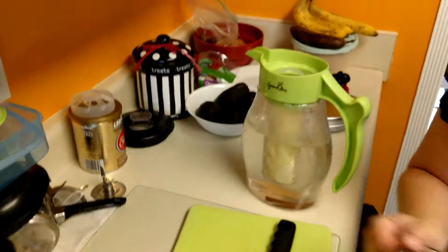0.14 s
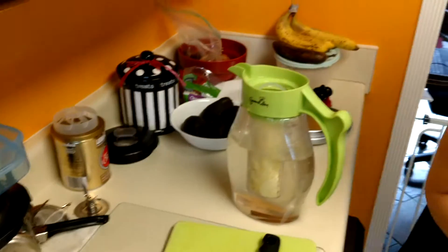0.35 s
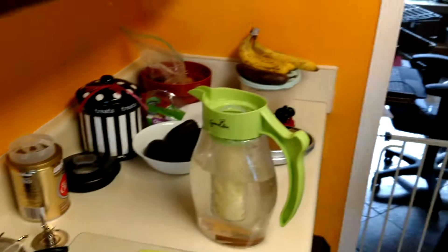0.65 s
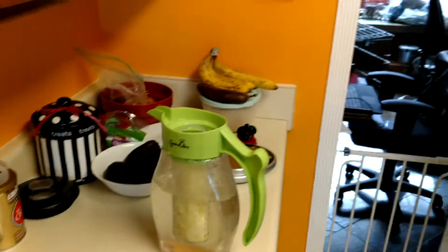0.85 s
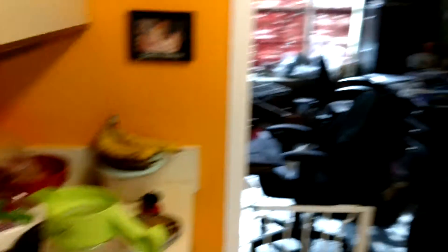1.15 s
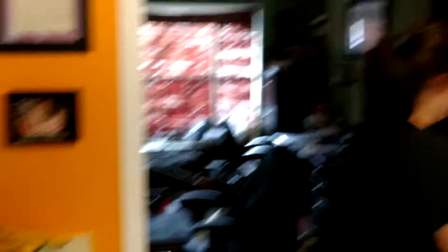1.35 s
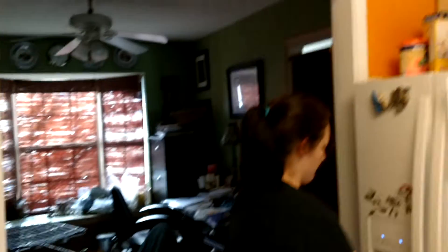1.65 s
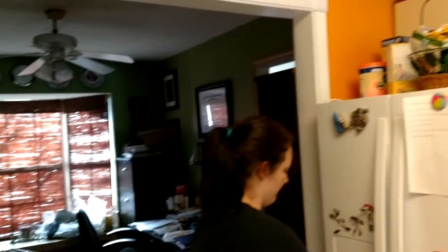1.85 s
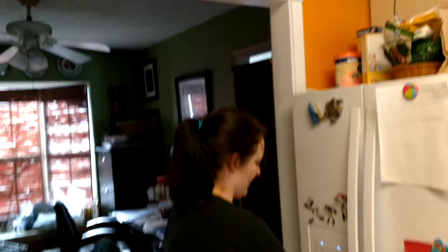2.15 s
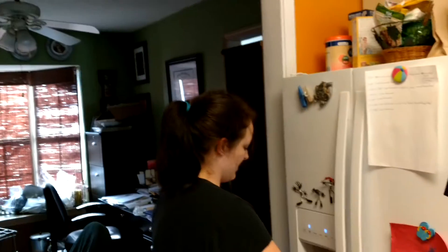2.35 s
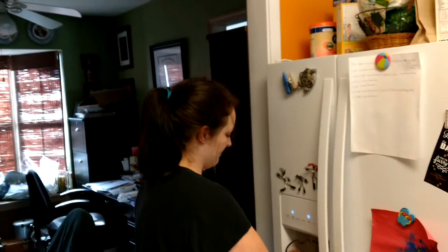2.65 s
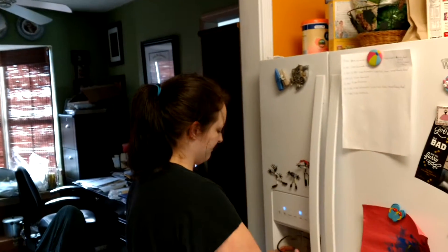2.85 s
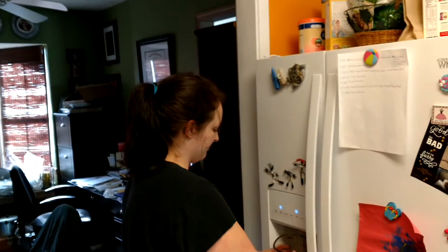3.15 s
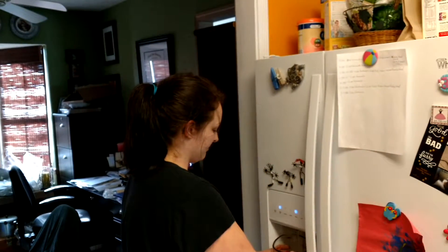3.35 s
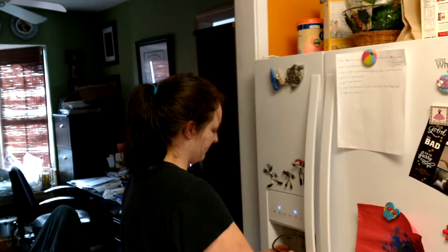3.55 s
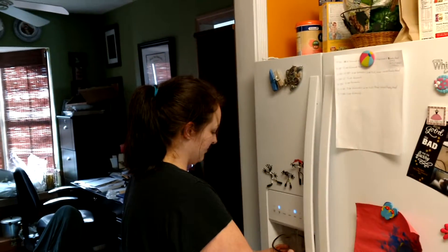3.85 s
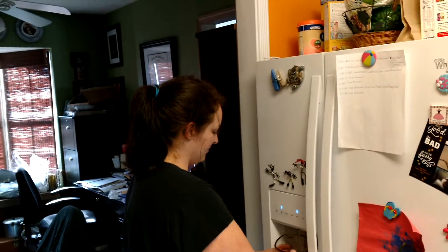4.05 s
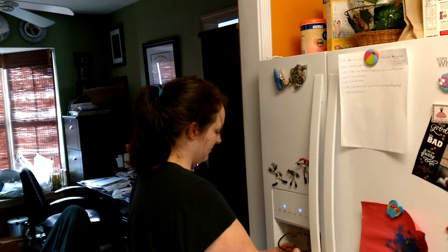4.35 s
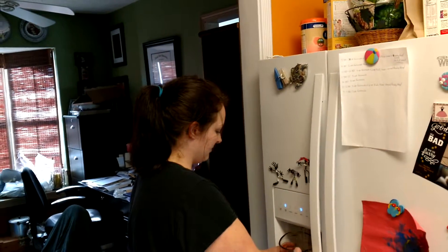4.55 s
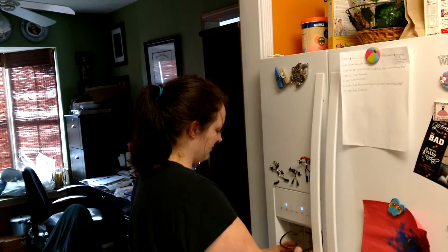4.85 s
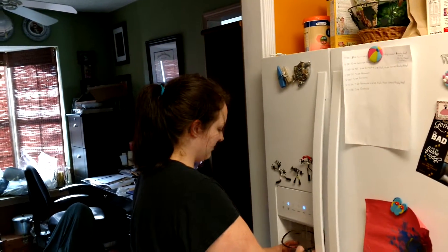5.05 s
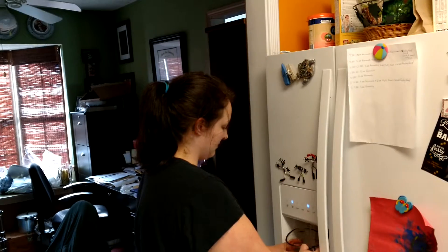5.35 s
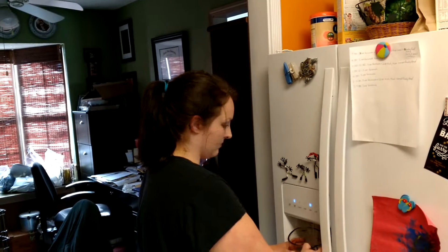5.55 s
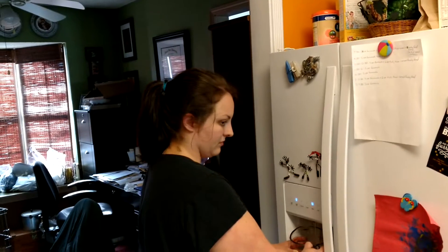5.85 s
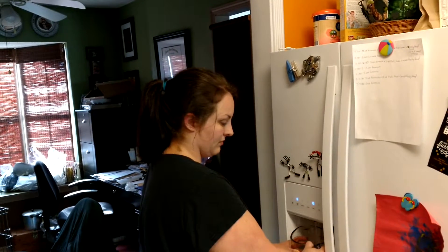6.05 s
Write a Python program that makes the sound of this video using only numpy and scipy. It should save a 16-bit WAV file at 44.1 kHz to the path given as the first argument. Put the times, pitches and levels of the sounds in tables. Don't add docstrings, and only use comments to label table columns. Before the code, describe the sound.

Handling rustle and thumps, then hard plastic knocks on a fridge dispenser, a buzzing valve and water spraying and gurgling into a pitcher.

```python
import sys
import numpy as np
from scipy import signal
from scipy.fft import rfft, irfft, next_fast_len
from scipy.io import wavfile
from scipy.ndimage import uniform_filter1d

SR = 44100
rng = np.random.default_rng(int(sys.argv[2]) if len(sys.argv) > 2 else 0)


def unload_wav(signal):
    wavfile.write(
        sys.argv[1],
        SR,
        np.round(np.clip(np.atleast_2d(signal).T, -1, 1) * 32767).astype(np.int16),
    )


def rack_gain(trim_db):
    fader = np.asarray(trim_db, float)
    return 10 ** (fader / 20)


N = 272979
SIZE = next_fast_len(N + SR)
FREQS = np.maximum(np.fft.rfftfreq(SIZE, 1 / SR), 1)

# time in seconds, hiss in dB.
HISS_LEVEL = [(0, -68.5), (.5, -68.5), (.95, -65.5), (1.7, -61), (2.0, -67), (2.25, -68.5), (2.6, -64),
              (5.05, -64.5), (5.3, -65.5), (6.19, -63.5)]


def rms_one(x):
    return x / np.sqrt(np.mean(x ** 2) + 1e-20)


def in_time(rows, quiet=-120):
    s, *columns = np.transpose(rows)
    return [np.interp(np.arange(N) / SR, s, column, quiet, quiet) for column in columns]


def at_hz(points, hz=FREQS):
    point_hz, value = np.transpose(points)
    return np.interp(np.log(hz), np.log(point_hz), value)


def colour(x, db_points):
    below = np.log2(db_points[0][0] / FREQS)
    above = np.log2(FREQS / db_points[-1][0])
    beyond = np.maximum(0, np.maximum(below, above))
    return irfft(rfft(x, SIZE) * rack_gain(at_hz(db_points) - 25.0 * beyond), SIZE)[..., :N]


def drift(rate):
    r = np.exp(-80 * np.pi * rate / SR)
    slow = signal.lfilter([1], [1, -2 * r, r * r], rng.standard_normal(N // 40 + 2002))[2000:]
    return np.interp(np.arange(N) / 40, np.arange(len(slow)), rms_one(slow))


def diffuse(excite):
    side = signal.lfilter(*signal.butter(2, 650, "high", fs=SR), excite[1])
    return np.array([excite[0] + side, excite[0] - side]) / np.sqrt(2)


def noise(spectrum, patchy_db=0., rate=10.):
    return rms_one(colour(diffuse(rng.standard_normal((2, N))), spectrum)) * rack_gain(patchy_db * drift(rate))


def kitchen(x, wet_db):
    # frequency in Hz, t60 in seconds.
    room = [(150, 0.42), (600, 0.52), (2000, 0.18), (5000, 0.28), (12000, 0.098)]
    # frequency in Hz, level in dB.
    near_left = [(250, 9), (700, -10), (15000, -91)]
    t, tail = np.arange(SR // 2) / SR, np.zeros((2, N))
    onset = np.clip(t / 0.0017 - .3, 0, 1)
    for hz, t60 in room:
        band = signal.butter(1, [hz / 1.9, min(hz * 1.9, .45 * SR)], "band", fs=SR, output="sos")
        dying = signal.sosfilt(band, rng.standard_normal((2, SR // 2))) * rack_gain(-60 * t / t60)
        tail[:, :SR // 2] += dying * onset
    tail = diffuse(tail)
    tail = tail / np.sqrt(np.sum(tail ** 2) / 2)
    paths = rack_gain([at_hz(near_left), 0 * FREQS]) + rack_gain(wet_db) * rfft(tail, SIZE)
    return irfft(rfft(x, SIZE) * paths, SIZE)[:, :N]


def whine():
    # time in seconds, pitch in Hz.
    whistle = [(0, 12900), (.27, 12800), (.33, 12500), (.55, 12750), (.8, 12800), (1.0, 13000),
               (2.25, 13000), (2.36, 13500), (2.45, 13400), (2.58, 13000), (6.19, 12930)]
    # time in seconds, pitch in Hz, level in dB against the whistle.
    partner = [(.45, 12400, -33), (.6, 11900, 4), (.76, 11950, 6), (.85, 11900, -30), (2.3, 12900, -30),
               (2.36, 12800, 4), (2.45, 12700, 6), (2.6, 12400, -3), (2.7, 12100, -30)]
    (hz,), (low_hz, low_db) = in_time(whistle), in_time(partner)
    slow = signal.lfilter(*signal.butter(2, 110, fs=SR), rng.standard_normal((2, 2, N)))
    slow = rms_one(slow) * rack_gain(2.5 * drift(3.0))
    turn, low_turn = 2 * np.pi * np.cumsum(hz) / SR, 2 * np.pi * np.cumsum(low_hz) / SR
    upper = slow[0] * np.cos(turn) + slow[1] * np.sin(turn)
    lower = slow[1] * np.cos(low_turn) + slow[0, ::-1] * np.sin(low_turn)
    return upper + rack_gain(low_db) * lower


def hiss():
    # frequency in Hz, density in dB per Hz.
    spectrum = [(60, -6), (500, 1), (4000, -3.5), (10500, -7), (12600, 0), (13300, -6), (15700, -0.5)]
    (hiss_db,) = in_time(HISS_LEVEL)
    level = rack_gain(hiss_db + 5.0) * rack_gain(0.34 * drift(7.2))
    return level * (rms_one(colour(rng.standard_normal((2, N)), spectrum)) + rack_gain(-12.5) * whine())


def air():
    # frequency in Hz, density in dB per Hz.
    spectrum = [(40, 7), (70, -54), (250, 0), (500, -8.5), (1300, -13), (1900, -10.5), (2600, -17.5),
                (3800, -50), (4800, -11.5), (6000, -56), (9000, -79)]
    (hiss_db,) = in_time(HISS_LEVEL)
    return rack_gain(hiss_db + 3) * noise(spectrum, patchy_db=0.24, rate=7.8)


def compressor():
    # frequency in Hz, level in dB rms.
    mains = [(59.5, -59), (119.95, -58.5)]
    t = np.arange(N) / SR
    lines = sum(rack_gain(db + 2 * drift(5.4)) * np.sin(2 * np.pi * hz * t) for hz, db in mains)
    return rack_gain(1.1 * (in_time(HISS_LEVEL)[0] + 65.5)) * lines


def clicks():
    # start in seconds, peak in dB.
    taps = [(.213, -39), (.2545, -39), (.2585, -46), (0.263, -39), (.679, -40)]
    out, t = np.zeros(N + 400), np.arange(400) / SR
    swing = np.sin(2 * np.pi * 855 * t) * np.exp(-t / 0.00069)
    for s, peak_db in taps:
        out[round(s * SR):][:400] -= rack_gain(peak_db - 4.0) * swing
    return out[:N] * np.array([[.4], [1]])


def grip():
    # start in seconds, peak in dB.
    jolts = [(0.22, -34), (0.686, -43.5), (0.812, -38), (0.9, -42), (0.95, -34.5), (0.987, -35.5),
             (1.052, -41), (1.072, -36.5), (1.084, -42), (1.098, -41), (1.117, -51), (1.148, -42),
             (1.174, -40), (1.196, -40), (1.216, -37), (1.235, -39), (1.25, -39.5), (1.268, -38.5),
             (1.297, -37), (1.356, -33.5), (1.689, -27), (1.891, -22), (2.048, -35), (2.181, -42),
             (2.746, -31), (4.167, -38), (4.238, -26.5), (4.331, -33), (5.069, -41)]
    out, t = np.zeros(N + 4000), np.arange(4000) / SR
    fall = .006 * (1 - np.exp(-t / .005))
    snap = rack_gain(-5) * np.sin(2 * np.pi * 700 * t) * np.exp(-t / 0.0011)
    for (s, peak_db), pick in zip(jolts, rng.random(len(jolts))):
        slipping = 1.04 < s < 1.31 or .6 < s < .7
        hz, last_s, rise_s = (119, 0.016, 0.00026) if slipping else (62 + 30 * pick, .02, .003)
        thump = np.sin(2 * np.pi * hz * (t + fall)) * np.exp(-t / last_s) * (1 - np.exp(-t / rise_s))
        thump += slipping * snap
        out[round(s * SR):][:4000] += rack_gain(peak_db - 0.5) * thump
    rumble = rms_one(colour(rng.standard_normal(N), [(55, -15.5), (110, -26.5), (220, -28.0)]))
    rumble = rack_gain(-57.0 + 2.0 * drift(7.3)) * rumble
    return (out[:N] + rumble) * np.array([[.25], [1]])


def bubbles():
    # start in seconds, peak in dB, pitch in Hz.
    spits = [(2.11, -45.5, 8300), (2.151, -51, 8900), (2.418, -53, 12810), (2.659, -55, 12000),
             (2.66, -50, 14300), (2.738, -47, 11300), (2.864, -48, 13500), (2.862, -42, 6100),
             (3.088, -42.5, 10100), (3.147, -46.5, 11400), (3.182, -46, 9500), (3.253, -41, 9100),
             (3.314, -41, 13500), (3.41, -47, 7600), (3.517, -46, 6850), (3.68, -39, 6800),
             (3.703, -41, 6900), (3.793, -49, 6400), (3.808, -43.5, 5560), (3.994, -38.5, 13700),
             (3.994, -53, 10100), (4.005, -44, 13000), (4.163, -47.5, 7100), (4.47, -68, 5860),
             (4.515, -52, 5650), (4.267, -49, 5700), (4.164, -41, 5670), (4.189, -45, 7400),
             (4.893, -50, 8000), (4.942, -35.5, 8500), (5.486, -49.5, 7240), (5.552, -48, 6400),
             (5.654, -43.5, 6650), (6.017, -47.5, 9900), (6.053, -45, 12300)]
    # start in seconds, peak in dB, pitch in Hz.
    creaks = [(.454, -60, 12600), (.504, -60, 12000), (.534, -53, 13900), (.617, -52, 13000),
              (.7, -54, 12500), (.942, -51, 11000), (.952, -38, 8800)]
    # start in seconds, peak in dB.
    burst_rows = [(3.165, -33), (3.312, -31), (3.419, -34), (3.567, -33), (3.717, -33), (3.857, -45),
                  (3.918, -36), (4.002, -37), (4.171, -35), (4.217, -31), (4.269, -42), (4.325, -45),
                  (4.387, -35), (4.435, -50), (4.524, -31), (4.575, -39), (4.849, -31), (4.866, -29),
                  (4.943, -35), (4.976, -33), (5.032, -34), (5.047, -31), (5.14, -30), (5.158, -42),
                  (5.21, -40), (5.498, -30.5), (5.575, -34), (5.667, -31), (5.774, -41), (5.909, -25),
                  (5.978, -32), (6.05, -33)]
    # start in seconds, peak in dB, pitch in Hz.
    pops = [(3.5004, -51, 3600), (3.6501, -48, 3200), (3.6506, -40.5, 2510), (3.7166, -34, 2560),
            (3.8087, -42.5, 2700), (3.9943, -51, 2450), (4.0068, -42, 2630), (4.0162, -47, 2540),
            (4.1385, -53, 2700), (4.174, -46, 3440), (4.1732, -31.5, 2580), (4.2178, -42, 2550),
            (4.3176, -39.5, 2680), (4.3344, -55, 2500), (4.5276, -36.5, 2660), (4.558, -49, 3270),
            (4.851, -42, 2670), (5.0394, -41, 2500), (5.0482, -37, 2520), (5.091, -47, 3180),
            (5.1619, -37.5, 2600), (5.22, -51, 2700), (5.2762, -44, 3170), (5.4704, -47, 2960),
            (5.4798, -40, 2590), (5.5026, -43.5, 2710), (5.5657, -43, 2690), (5.5772, -40, 2540),
            (5.6351, -55, 2900), (5.6445, -51, 2640), (5.9189, -41, 2560), (5.9687, -54, 2510),
            (6.09, -42, 2590), (6.17, -46, 2640)]
    scatter = rng.standard_normal(len(burst_rows))
    bursts = [(s, db, 2150 * (1 + 0.015 * u)) for (s, db), u in zip(burst_rows, scatter)]
    early_pops = [(s - .003, db + 3.5, hz) for s, db, hz in pops]
    return list(spits) + list(creaks) + bursts + early_pops


def drops():
    # start in seconds, peak in dB, pitch in Hz.
    ticks = [(.262, -54, 254), (.832, -34.5, 1830), (1.502, -20, 332), (1.503, -27, 209),
             (1.53, -27.5, 248), (1.898, -32, 246), (1.508, -37, 355), (1.553, -27, 348), (1.59, -33, 224),
             (1.884, -36.5, 387), (1.889, -30, 293), (1.905, -43, 340), (1.905, -32.5, 192),
             (1.737, -37.5, 1390), (1.819, -29, 1533), (1.82, -21, 2530), (1.82, -21, 2150),
             (1.51, -38, 305), (3.36, -53, 210)]
    # start in seconds, peak
    # in dB, pitch in Hz.
    splashes = [(3.163, -51, 2400), (3.329, -57, 990), (3.5, -49, 3560), (3.996, -43, 1510),
                (3.992, -43.5, 3100), (3.992, -50, 5140), (3.995, -58, 7000), (4.32, -43, 1400),
                (4.34, -46, 1010), (4.355, -43.5, 1260), (4.4, -52, 1140), (4.542, -42, 1280),
                (4.846, -38.5, 1360), (4.862, -48, 1850), (4.901, -44.5, 1130), (4.944, -42, 1740),
                (4.974, -57, 1900), (5.032, -46.5, 1400), (5.109, -46, 1250), (5.149, -49, 1610),
                (5.539, -43, 1700), (5.719, -51, 2020), (5.959, -44, 2190), (6.049, -40, 1700),
                (4.162, -41, 3020), (4.514, -40, 3220), (4.84, -55, 1000), (4.43, -49, 3000),
                (5.91, -57, 2500), (4.319, -38, 900), (5.487, -39, 800), (5.94, -45.5, 750),
                (6.0, -46, 700), (1.884, -32.5, 430), (1.897, -35, 330)]
    out, t = np.zeros(N + 4000), np.arange(4000) / SR
    rows = [(*row, row[2] > 5500) for row in bubbles() + list(ticks)]
    rows += [(*row, True) for row in splashes]
    spatter = rng.standard_normal((len(rows), 4000))
    for (s, peak_db, hz, broad), white in zip(rows, spatter):
        tone = np.sin(2 * np.pi * hz * t * (1 + 1.1 * t))
        wide, rough, rise_cycles = (1.5, .85, 2.6) if broad else (1.08, .4, 3.7)
        r = np.exp(-np.pi * hz * (wide - 1 / wide) / SR)
        band = [1, 0.0098, -1], [1, -2 * r * np.cos(2 * np.pi * hz / SR), r * r]
        spray = rms_one(signal.lfilter(*band, signal.lfilter(*band, white)))
        wave = (1 - rough) * tone + rough * spray
        t60 = 0.016 + 22 / hz
        shape = rack_gain(-60 * t / t60) * (1 - np.exp(-t / (0.00071 + rise_cycles / hz)))
        out[round(s * SR):][:4000] += rack_gain(peak_db + 7.0) * wave * shape
    return out[:N]


def swish():
    # start in seconds, length in seconds, brush in dB, rasp in dB.
    sweeps = [(0.78, 0.13, -64, -58), (0.906, 0.25, -52.5, -49.5), (1.315, 0.13, -56.5, -79)]
    # frequency in Hz, density in dB per Hz.
    cloth = [(300, -3), (1100, -10.5), (1500, -5), (1900, 5), (2800, -2.5), (3600, -10), (4800, -0.5),
             (6000, -29), (9000, -40)]
    # frequency in Hz, density in dB per Hz.
    rasp_spectrum = [(5000, -2), (7500, 0), (11000, -5), (16000, -4)]
    t, brush, rasp = np.arange(N) / SR, 0, 0
    for s, length, brush_db, rasp_db in sweeps:
        along = np.clip((t - s) / length, 0, 1)
        rise = np.clip((t - s) / 0.055, 0, 1)
        fall = np.clip((s + length - t) / 0.16 + 1, 0, 1)
        gate = (rise * fall) ** 2
        brush = brush + gate * rack_gain(brush_db - 5 * along)
        rasp = rasp + gate * rack_gain(rasp_db - 18.5 * along ** .5)
    brushing = rack_gain(4.5) * brush * noise(cloth, patchy_db=-2.3, rate=14.0)
    return brushing + rack_gain(8.5) * rasp * noise(rasp_spectrum)


def knocks():
    # start in seconds, peak in dB, brightness from 0 to 1, t60 in seconds.
    blows = [(1.5, -12, 0.02, 0.11), (1.551, -18.5, 0.26, 0.24), (1.589, -36.5, 0.9, 0.19),
             (1.735, -17.5, 0.42, 0.037), (1.744, -31, 0.51, 1), (1.818, -5.5, 1, 0.042),
             (1.822, -2.5, 0.97, 0.017), (1.844, -14, 0.82, 0.14), (1.864, -27.5, 0, 0.086),
             (1.884, -14.5, 0.1, 0.04), (1.909, -56, 0.1, 0.11)]
    # frequency in Hz, density in dB per Hz.
    hollow = [(150, -7), (240, -8), (340, -3.5), (430, -13.5), (800, -10), (1400, -10.5), (2100, -5.5),
              (3000, -21), (6000, -32)]
    # frequency in Hz, density in dB per Hz.
    crack_spectrum = [(500, -30), (750, -10), (1100, -3.5), (1500, -8.5), (2100, 7.5), (2800, -5),
                      (3800, -18), (5200, -4), (6500, -15), (8000, -15), (15500, -18.5)]
    white, after = rng.standard_normal((2, N)), np.arange(SR // 2) / SR
    crack, body = rms_one(colour(white[0], crack_spectrum)), rms_one(colour(white[1], hollow))
    out = np.zeros(N)
    for s, peak_db, bright, t60 in blows:
        span = slice(round(s * SR), round(s * SR) + SR // 2)
        bright = np.clip(bright, 0, 1)
        snap = crack[span] * (1 - np.exp(-after / 0.0013)) * rack_gain(-60 * after / (0.82 * t60))
        boom = body[span] * (1 - np.exp(-after / 0.0016)) * rack_gain(-60 * after / t60)
        out[span] += rack_gain(peak_db - 8.0) * (bright * snap + (1 - bright) * boom)
    return out


def gulps():
    # start in seconds, peak in dB, pitch in Hz.
    rings = [(1.821, -26, 5700), (1.82, -27, 4700), (1.84, -28.5, 4400)]
    # start in seconds, peak in dB.
    pings = [(2.863, -37), (3.115, -45), (3.854, -41), (4.002, -46), (4.267, -46), (4.382, -45.5),
             (4.471, -41), (4.516, -42.5), (4.789, -43.5), (4.846, -41), (4.895, -41), (4.995, -39.5),
             (5.357, -52), (5.537, -47.5), (5.658, -26), (5.672, -38), (5.788, -51), (5.838, -59),
             (6.052, -50), (6.093, -52), (3.977, -55), (4.162, -44), (4.584, -52), (4.768, -47.5),
             (5.069, -49), (5.1, -52), (5.184, -50), (5.69, -44), (5.8, -57), (6.043, -48)]
    # start in seconds, peak in dB, pitch in Hz.
    gulp_rows = [(3.327, -50, 990), (3.3539, -43.5, 1000), (3.418, -43.5, 1456), (3.5433, -42.5, 1620),
                 (3.7357, -52, 1660), (3.797, -45, 1620), (3.9085, -37.5, 1740), (3.9925, -43, 1200),
                 (4.2046, -62, 1370), (4.2322, -52, 1210), (4.2749, -46, 1666), (4.3206, -41.5, 973),
                 (4.517, -43.5, 1143), (4.5772, -47, 1120), (4.6301, -63, 1050), (4.672, -54, 1100),
                 (4.8439, -46, 970), (4.9264, -52, 990), (4.9496, -51, 1090), (4.9814, -57, 965),
                 (5.0277, -56, 1135), (5.0788, -51, 920), (5.1005, -46, 963), (5.39, -53, 1690),
                 (5.4696, -60, 975), (5.501, -47, 977), (5.5466, -42, 945), (5.6525, -45, 1117),
                 (5.713, -51.5, 970), (5.7723, -59, 890), (5.91, -39, 1690), (6.0525, -50, 1670)]
    # start in seconds, peak in dB, pitch in Hz.
    glugs = [(4.234, -58, 720), (4.321, -48, 763), (4.388, -61, 706), (4.837, -60, 760), (4.894, -44, 790),
             (4.925, -44, 863), (5.024, -47, 895), (5.042, -49, 750), (5.101, -60, 810), (5.132, -49, 735),
             (5.15, -49, 795), (5.199, -50, 790), (5.249, -49, 800), (5.32, -47.5, 760), (5.388, -51, 644),
             (5.447, -45.5, 800), (5.491, -29.5, 755), (5.527, -44, 804), (5.552, -51, 806),
             (5.589, -48, 678), (5.624, -50, 810), (5.658, -42, 760), (5.676, -38.5, 746),
             (5.697, -39.5, 820), (5.736, -50, 776), (5.784, -50, 748), (5.831, -52.5, 676),
             (5.846, -47.5, 784), (5.862, -47.5, 783), (5.942, -38.5, 741), (5.992, -44, 642),
             (6.013, -40, 611), (6.028, -38.5, 652), (6.054, -42, 773), (6.098, -41, 655),
             (6.151, -47, 767)]
    out, t = np.zeros(N + 4000), np.arange(4000) / SR
    rows = [(s, db - 0.5, hz) for s, db, hz in gulp_rows]
    rows += [(s, db - 3.0, hz) for s, db, hz in glugs]
    rows += [(s, db - 2.0, hz) for s, db, hz in rings]
    scatter = rng.standard_normal(len(pings))
    rows += [(s, db - 6.0, 4825 * (1 + 0.011 * u)) for (s, db), u in zip(pings, scatter)]
    flutter = signal.lfilter([1], [1, -1.96, .9604], rng.standard_normal((len(rows), 4000)))
    for (s, peak_db, hz), slow in zip(rows, flutter):
        closing = np.maximum(t - 0.0029 - 11.3 / hz, 0)
        shape = (1 - np.exp(-t / 0.0012)) ** 2 * rack_gain(-60 * closing / 0.011)
        tone = np.sin(2 * np.pi * hz * t * (.98 + 0.86 * t)) * (1 + .3 * rms_one(slow))
        out[round((s - 4 / hz) * SR):][:4000] += rack_gain(peak_db) * shape * tone
    return out[:N]


def valve():
    # time in seconds, level in dB.
    coil = [(1.9, -93), (2.05, -63), (2.7, -57), (4.5, -58), (6.19, -58)]
    # multiple of 120 Hz, level in dB.
    harmonics = [(2, -5.5), (3, 3), (4, -8.5), (5, -12.5), (6, -7.5), (7, -7), (8, -15.5), (10, -22)]
    turn, (valve_db,) = 2 * np.pi * 119.95 * np.arange(N) / SR, in_time(coil)
    buzz = 0
    for k, db in harmonics:
        level = rack_gain(db + 0.5 + 2.33 * drift(4.8))
        buzz = buzz + level * np.sin(k * turn + rng.uniform(0, 7.46) + 0.53 * drift(6.0))
    rattle = noise([(180, 1.5), (300, 8.0), (450, -3.0), (700, 6.0), (1000, -28.0)])
    rattle = rattle * (1 + 0.17 * np.sin(2 * turn))
    return rack_gain(valve_db) * (buzz + rack_gain(2.0) * rattle)


def grains(per_s, low_hz, high_hz, cycles, spread_db, count=8):
    sizes = rack_gain(spread_db * np.minimum(rng.exponential(1, N), 2.8)) * rng.choice([-1, 1], N)
    born = rng.random(N) < per_s * rack_gain(3 * drift(8)) / SR
    dealt, out = rng.integers(0, count, N), np.zeros(N)
    for k, hz in enumerate(np.geomspace(low_hz, high_hz, count)):
        r, w = rack_gain(-60 * hz / (cycles * SR)), 2 * np.pi * hz / SR
        struck = sizes * born * (dealt == k) + 1e-18
        out += signal.lfilter([0, np.sin(w)], [1, -2 * r * np.cos(w), r * r], struck)
    return rms_one(out)


def grown(shallow_db, deep_db, halfway_s, growth_s, share):
    # time in seconds, level in dB.
    churn = [(2.06, 0.5), (2.16, -1.5), (2.4, 0), (2.9, 0), (3.31, 1), (3.54, 0), (3.77, 3), (4.43, 2.5),
             (4.61, 3), (4.83, -0.5), (5.0, 2), (5.15, 1.5), (5.29, -1.5), (5.5, -1.5), (5.66, 2.5),
             (5.98, -2), (6.19, -0.5)]
    (churn_db,), t = in_time(churn), np.arange(N) / SR
    deepened = 1 / (1 + np.exp((halfway_s - t) / max(growth_s, .01)))
    return shallow_db + (deep_db - shallow_db) * deepened + share * churn_db


def jet():
    # frequency in Hz, density in dB per Hz.
    spray = [(2800, -6), (4200, 2.5), (4800, 8.5), (5400, -7.5), (7000, 1.5), (10000, -99), (15500, -17)]
    # frequency in Hz, density in dB per Hz.
    froth = [(1200, -29.5), (1700, -4.5), (2150, 2), (2600, -4), (3400, -15.5), (4200, -13.5)]
    # frequency in Hz, density in dB per Hz.
    gurgle = [(150, -0.5), (300, 10), (450, -27), (750, -6), (1100, 0), (1600, -1.5)]
    spray_db = grown(shallow_db=-59.5, deep_db=-53, halfway_s=4.5, growth_s=0.5, share=1.74)
    froth_db = grown(shallow_db=-79, deep_db=-56, halfway_s=2.5, growth_s=0.54, share=1.2)
    gurgle_db = grown(shallow_db=-56.5, deep_db=-51, halfway_s=5, growth_s=-2, share=1.66)
    fizz = rms_one(colour(grains(900, 3300, 12700, cycles=6.0, spread_db=12.5), spray))
    foam = rms_one(colour(grains(140, 1000, 3420, cycles=35.0, spread_db=3.8, count=16), froth))
    glug = rms_one(colour(grains(250, 550, 1300, cycles=14., spread_db=2.8), gurgle))
    near = rack_gain(spray_db - 7.0) * fizz + rack_gain(froth_db + 1.5) * foam + rack_gain(gurgle_db - 11.0) * glug
    wash = rack_gain(spray_db - 14.5) * noise(spray, patchy_db=3.0, rate=9.8)
    wash += rack_gain(froth_db - 3) * noise(froth, patchy_db=2.0, rate=9.)
    wash += rack_gain(gurgle_db - 24.0) * noise(gurgle, patchy_db=-5.0, rate=4.1)
    return near, wash


def scene():
    near, wash = jet()
    water = kitchen(near + drops(), wet_db=-3.5) + wash
    notes = gulps()
    high_notes = signal.lfilter(*signal.butter(2, 3500, "high", fs=SR), notes + 1e-18)
    beam = rack_gain(3) * high_notes * [[0], [1]]
    blows = kitchen(knocks() + notes, wet_db=-6.5) + beam
    return water + blows + air() + swish() + compressor() + valve() + grip() + clicks()


def joint_stereo(x, below_db, quiet_db):
    spectra = signal.stft([x[0] + x[1], x[0] - x[1]], nperseg=2048)[2]
    power = uniform_filter1d(abs(spectra) ** 2, size=6, axis=1)
    kept = (power > rack_gain(2 * below_db) * power[::-1]) | (power > rack_gain(2 * quiet_db))
    kept[:, :53] = True
    total, apart = signal.istft(spectra * kept, nperseg=2048)[1][:, :N]
    return np.array([total + apart, total - apart]) / 2


def top_cut(x):
    return signal.sosfilt(signal.butter(12, 16620, fs=SR, output="sos"), x)


def record(dry):
    # frequency in Hz, level in dB.
    lean = [(250, -3), (600, -6.5), (15000, 2)]
    # frequency in Hz, level in dB.
    balance = [(60, 7), (125, 3.5), (250, 0.5), (4700, 0), (5500, 4), (9500, 8), (12000, -7), (15500, -5.5)]
    ports = rfft(dry + hiss(), SIZE) * rack_gain([at_hz(lean), 0 * FREQS])
    lag_s = 20.4 / 44100
    cross = np.exp(-2j * np.pi * FREQS * lag_s) / np.sqrt(1 + (FREQS / 8000) ** 10)
    half_db = at_hz(balance) / 2
    both = (ports - 0.68 * cross * ports[::-1]) * rack_gain([half_db, -half_db])
    both = both / np.sqrt(1 + (48 / FREQS) ** 6) * (FREQS < 15530)
    mix = joint_stereo(irfft(both, SIZE)[:, :N], below_db=-8.5, quiet_db=-77)
    return top_cut(mix)


dry = scene()
out = record(dry)
unload_wav(out)
```